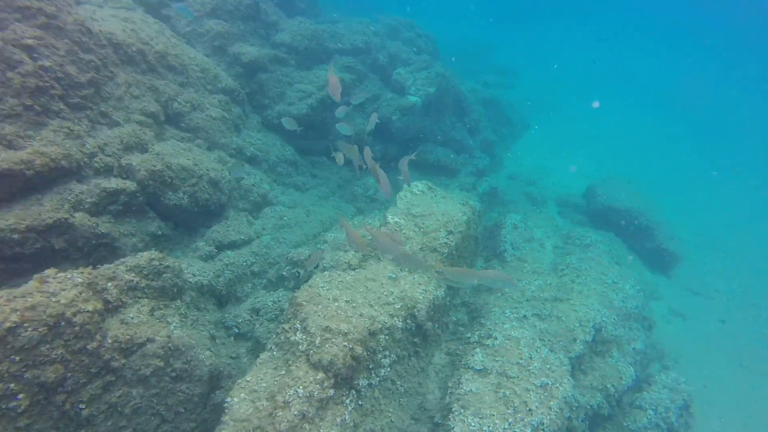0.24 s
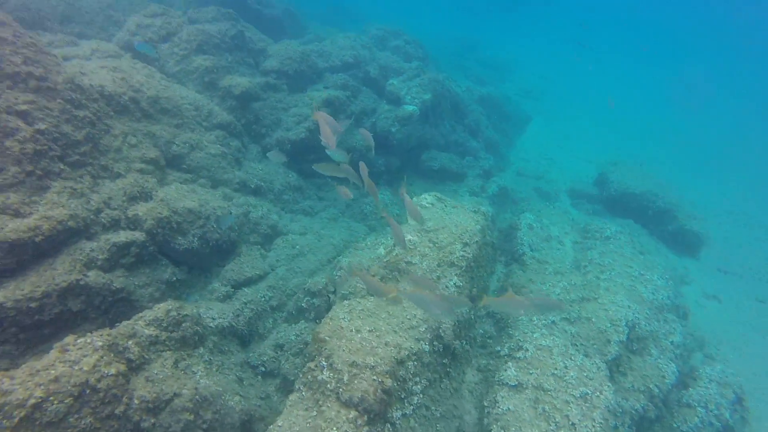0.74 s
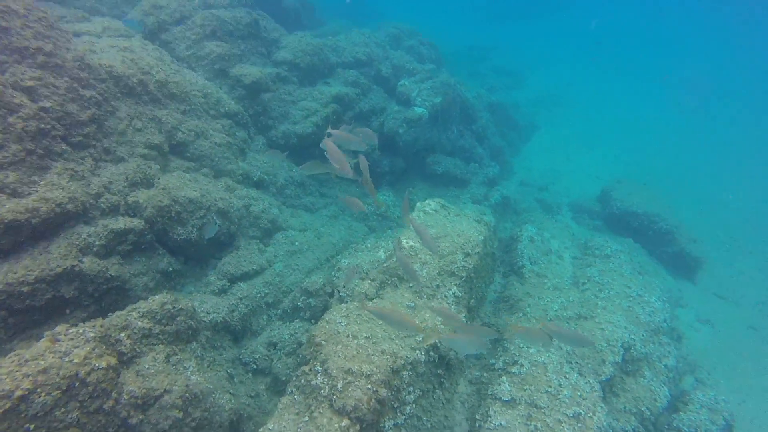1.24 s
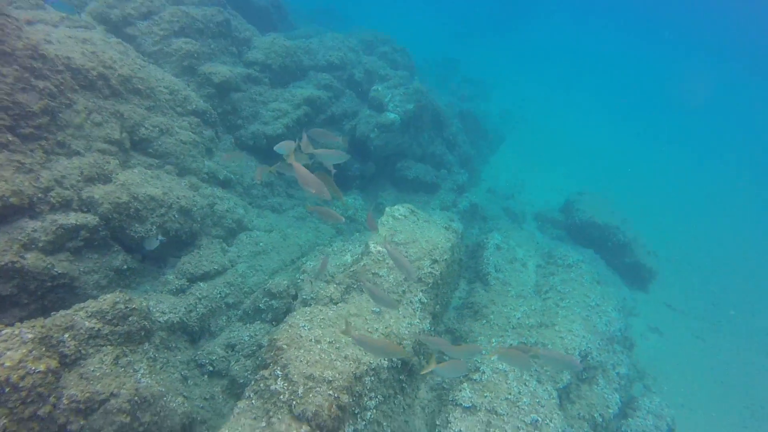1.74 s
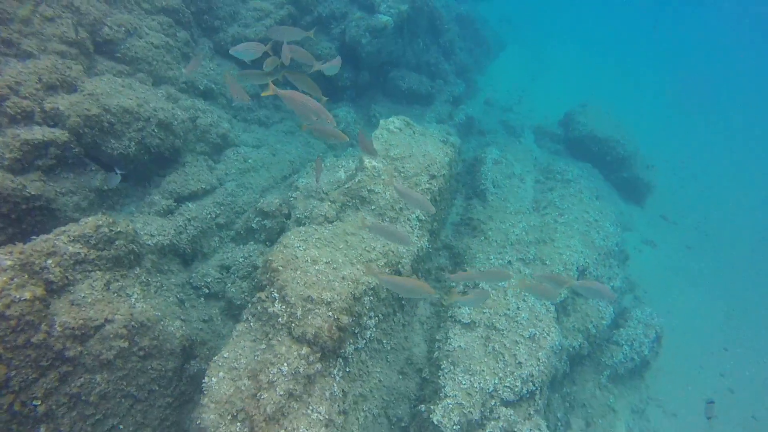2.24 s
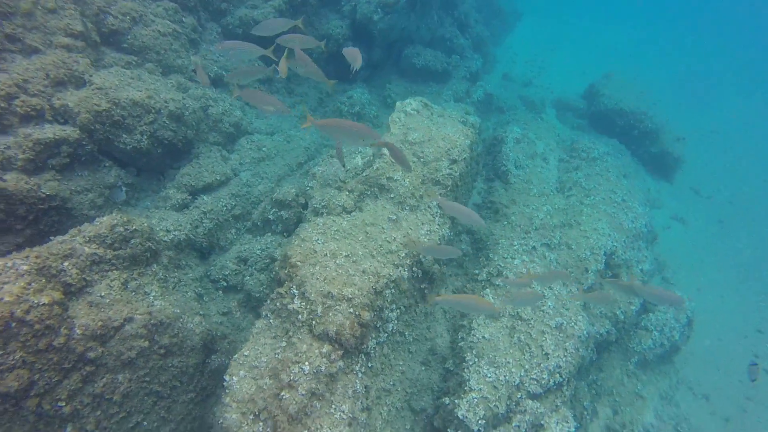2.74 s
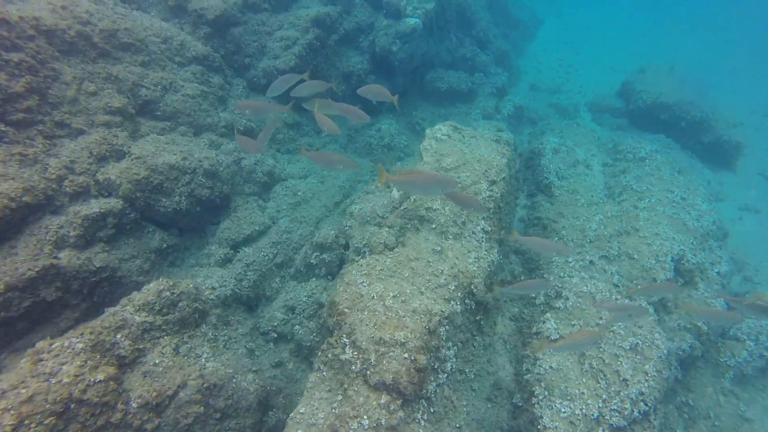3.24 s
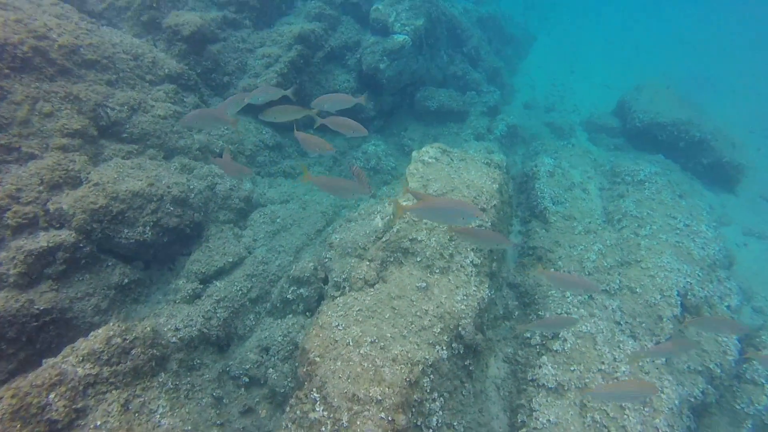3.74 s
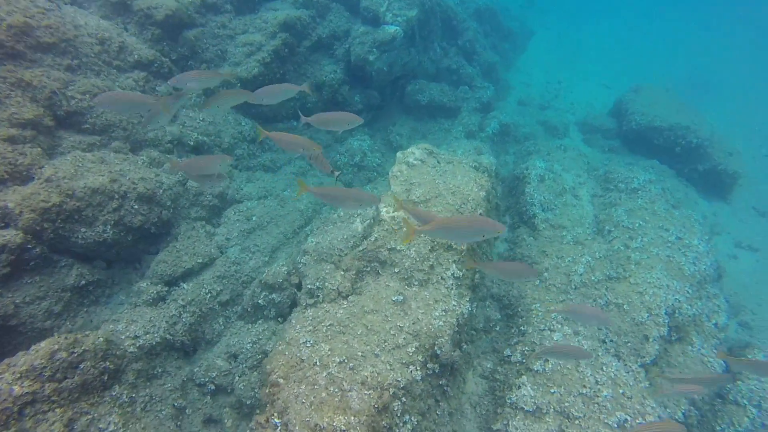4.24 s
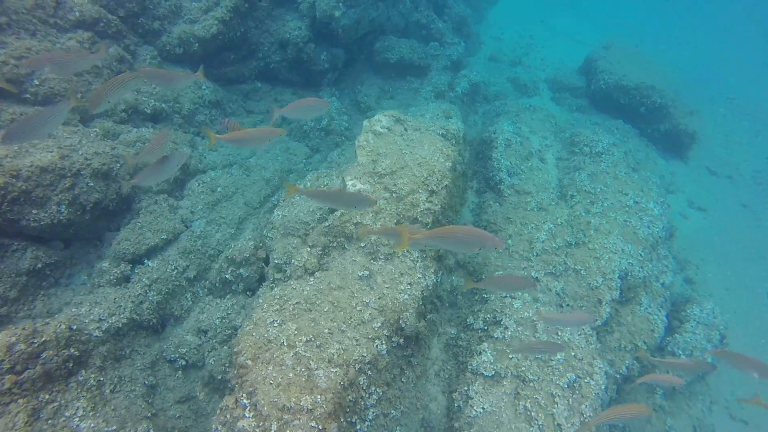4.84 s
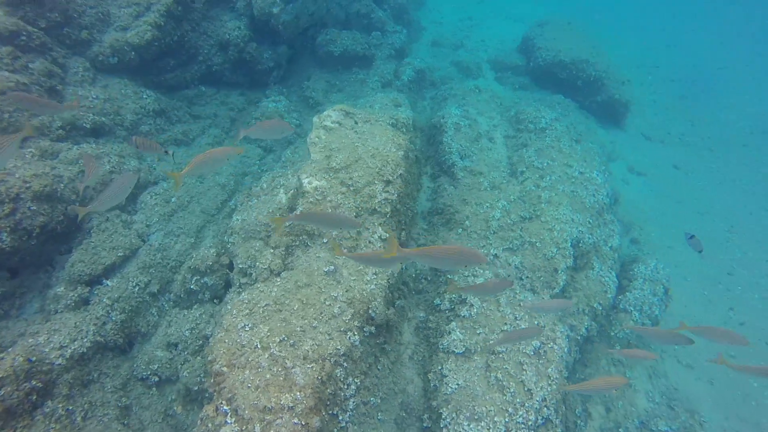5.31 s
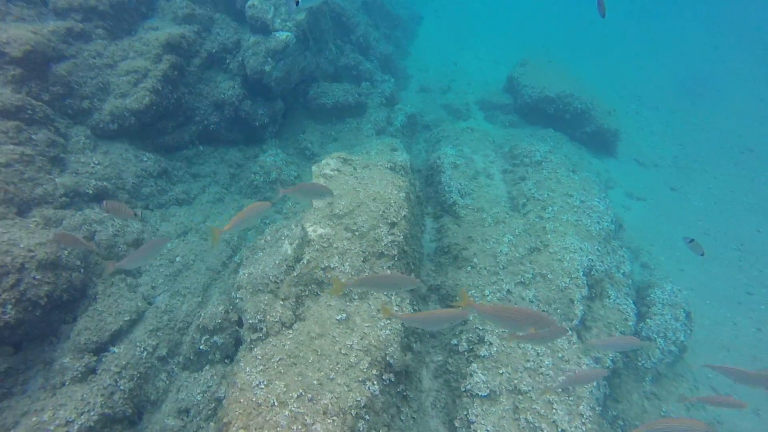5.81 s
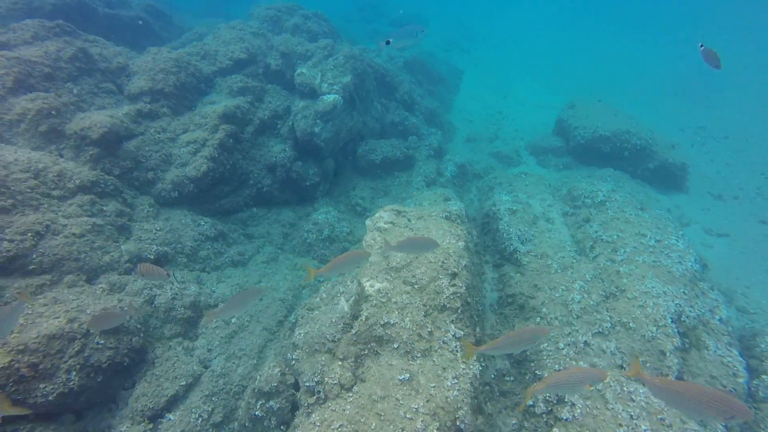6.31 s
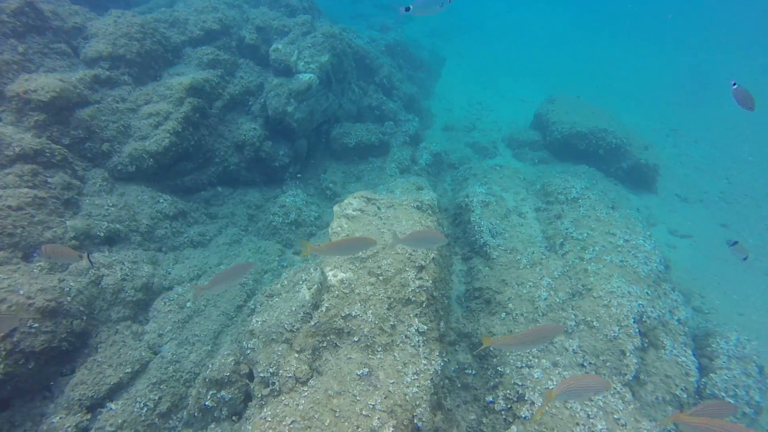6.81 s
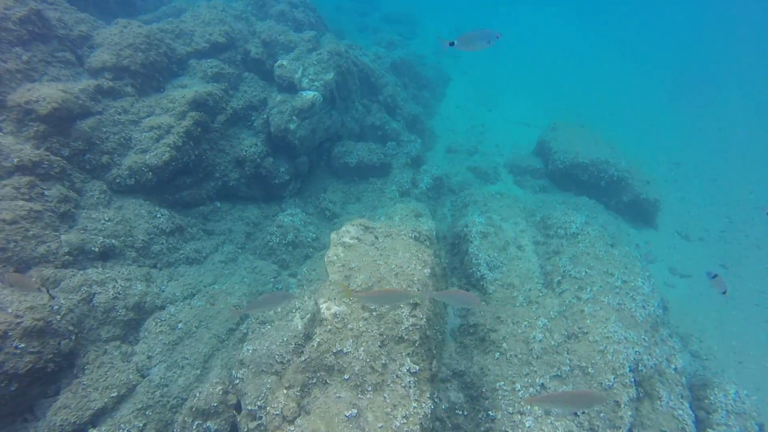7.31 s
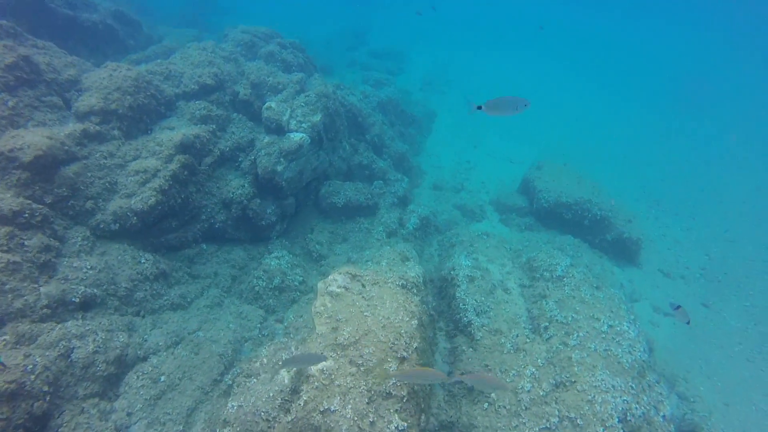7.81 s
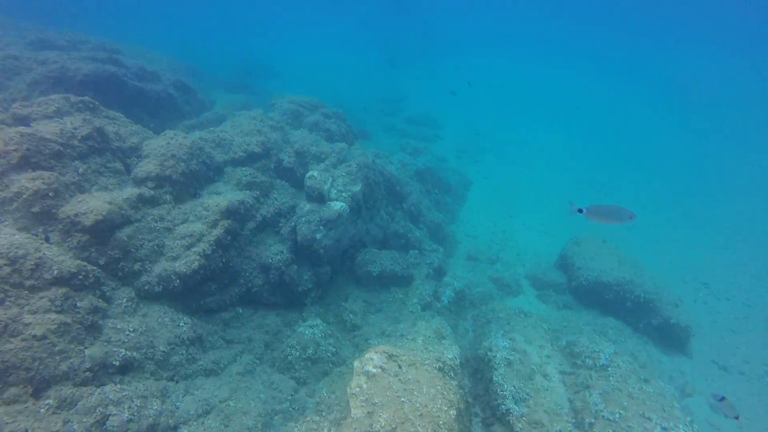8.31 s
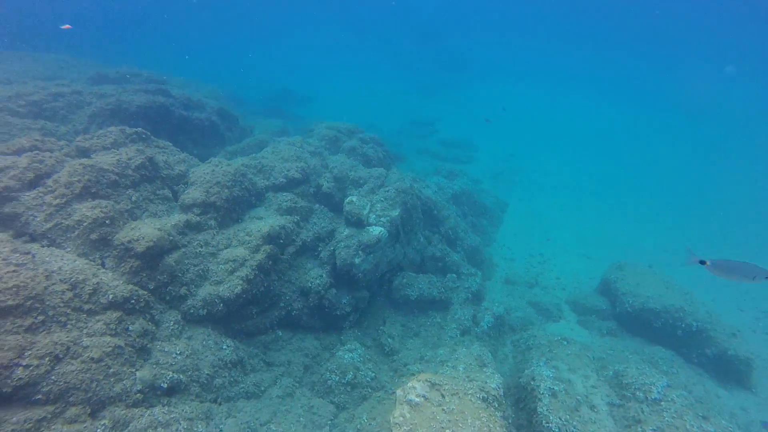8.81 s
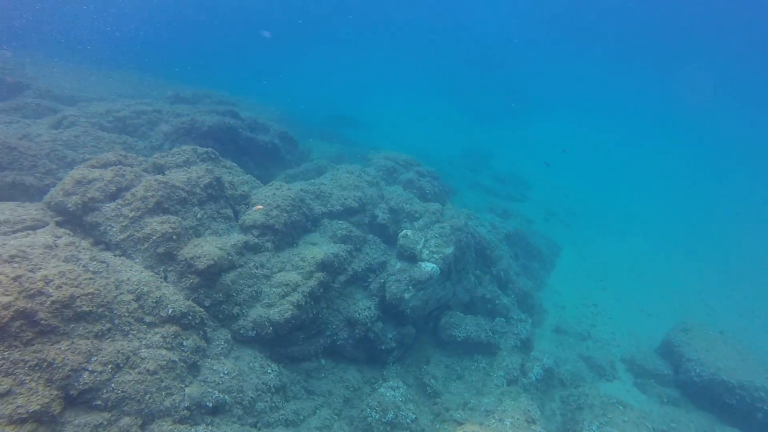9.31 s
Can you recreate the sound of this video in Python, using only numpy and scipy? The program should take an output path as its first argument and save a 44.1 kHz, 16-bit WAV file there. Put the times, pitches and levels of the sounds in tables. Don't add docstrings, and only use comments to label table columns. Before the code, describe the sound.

Steady dull sea hiss and tiny clicks, broken early by two creaky knocks and a rough wet rubbing on plastic, then calm again.

```python
import sys
import numpy as np
from scipy import signal
from scipy.io import wavfile

SR = 44100
rng = np.random.default_rng(int(sys.argv[2]) if len(sys.argv) > 2 else 0)


def rack_gain(trim_db):
    fader = np.asarray(trim_db, float)
    return 10 ** (fader / 20)


def log_audio(samples):
    frames = np.atleast_2d(samples).T
    limited = np.clip(frames, -1, 1)
    pcm = np.round(limited * 32767).astype(np.int16)
    wavfile.write(sys.argv[1], SR, pcm)


N = 421155

# resonance in Hz, width in Hz, level in dB.
WALL_MODES = [(653, 131, 7), (1784, 66, 3), (1910, 114, -2), (2440, 284, 2), (2603, 181, 6.5),
              (3180, 64, -4.5)]
# resonance in Hz, width in Hz, level in dB.
SEAL_MODES = [(4390, 110, 2.5), (4970, 1140, -9.5), (5830, 2260, -5), (7940, 320, -6.5), (8770, 400, -7),
              (11000, 900, -56), (12500, 1200, -24), (13600, 770, -26.5), (14800, 700, -35.5)]
# resonance in Hz, width in Hz, level in dB.
GRIP_MODES = [(355, 98, 1.5), (697, 130, 3.5), (953, 186, -0.5), (1120, 24, 2.5), (1376, 91, 2.5),
              (1580, 600, 1), (2070, 280, -36), (2330, 240, 5.5), (2625, 330, -7.5), (3110, 340, -12.5)]
# resonance in Hz, width in Hz, level in dB.
GRIP_TREBLE_MODES = [(3410, 87, 4.5), (4180, 260, -1), (4600, 280, -10), (5140, 380, -7.5),
                     (5900, 430, -21), (6400, 180, -22), (8200, 5600, -34), (10600, 1300, -39.5)]
# time in seconds, level in dB.
SWELL_CURVE = [(0.0, -47.5), (0.61, -37.5), (0.96, -49.5), (1.41, -31.5), (2.05, -45), (2.44, -43),
               (2.98, -33), (3.46, -50), (3.7, -43), (4.1, -45), (4.63, -47.5), (5.58, -44), (6.75, -48.5),
               (7.13, -39), (7.42, -42), (7.95, -44), (8.32, -44), (9.55, -47)]
# start in seconds, then upper wall, lower wall and top wall levels in dB.
SNAPS = [(0.0288, -9, -6, -14.5), (0.5182, -29, -33.5, -47), (0.6205, -25, -25.5, -34.5),
         (0.7337, -25, -29, -43), (0.9857, -16.5, -25, -43), (1.0755, -34, -29, -39.5),
         (1.1278, -22.5, -24, -38), (1.1752, 0.5, -13.5, -27), (1.26, -12.5, -30, -39),
         (1.6531, -24, -31, -43), (3.7858, -24, -31.5, -43), (3.9135, -21, -27, -40),
         (3.9465, -23, -27.5, -50), (4.0298, -27, -30, -44), (4.0956, -17, -31, -38),
         (4.7576, -18, -31, -46), (5.054, -17, -26.5, -30), (5.271, -18, -27, -37),
         (5.7349, -23, -28, -41.5), (5.934, -19, -21, -46), (5.9499, -12.5, -30, -24.5),
         (6.139, -20, -40, -33.5), (6.1739, -19.5, -20, -37), (6.6279, -29, -27.5, -39.5),
         (7.0784, -21, -29, -41), (7.3582, -15, -21.5, -42), (7.7643, -11.5, -17.5, -43),
         (8.1759, -27, -26, -45.5), (8.8059, -19.5, -34, -45), (9.236, -15.5, -20, -47)]
# start in seconds, level in dB.
THIN_SNAPS = [(0.473, -26.5), (0.9243, -24.5), (0.971, -22), (1.3224, -17), (3.1386, -32), (3.166, -32),
              (3.4371, -24.5), (3.4576, -25.5), (3.5672, -28), (3.7464, -21.5), (3.8814, -22.5),
              (4.0116, -24), (4.7115, -29), (5.2311, -25), (5.4161, -24), (5.8247, -33), (6.7416, -27),
              (6.9107, -29), (7.1258, -23), (7.5099, -21.5), (7.7493, -26), (8.0117, -28), (8.4986, -26.5),
              (8.6077, -22.5), (8.8217, -16), (9.0633, -26), (9.1721, -24), (9.3493, -20.5), (9.426, -28),
              (9.4804, -24)]
# start in seconds, low treble in dB, high treble in dB.
TICKS = [(0.0303, -39, -37), (0.6033, -35.5, -60), (0.6348, -48, -43), (0.7302, -39, -39),
         (0.9233, -36, -45), (1.1752, -53, -41), (1.26, -25, -38), (1.653, -28.5, -37), (3.6481, -35, -44),
         (3.7863, -33, -45), (3.8843, -35, -48), (3.9146, -35, -45), (4.2462, -34, -42), (4.588, -40, -40),
         (5.054, -25, -43), (5.1368, -28.5, -40), (5.1906, -35.5, -50), (5.2705, -37, -55),
         (5.9494, -53, -42), (6.14, -28.5, -61), (6.4364, -49, -45), (6.6269, -37.5, -54),
         (7.0774, -40, -47), (7.3567, -39, -43), (7.7904, -38, -56), (8.112, -37, -44), (8.2908, -41, -43),
         (8.498, -47, -42), (8.8061, -30, -44), (9.044, -37, -39)]
# start in seconds, level in dB.
FAINT_TICKS = [(0.12, -39), (0.4105, -49), (0.7035, -41), (1.5075, -44), (1.6664, -36), (1.957, -43),
               (1.9914, -43.5), (3.4366, -44), (3.6352, -47), (3.747, -40), (4.0285, -39), (4.0951, -42),
               (4.2638, -43), (4.5627, -41), (4.7566, -42), (4.931, -42), (4.994, -41.5), (6.2732, -39),
               (6.5121, -42), (6.787, -39), (7.017, -41), (7.1504, -41), (7.6835, -40), (8.1527, -40),
               (8.3195, -40), (8.542, -42), (9.1891, -40), (9.233, -37), (9.4814, -40)]
# start in seconds, peak in dB, pitch in Hz.
BUBBLES = [
    (1.203, -28.5, 614),
    (3.522, -34.5, 730),
    (5.826, -36.5, 875),
    (6.29, -35.5, 436),
    (7.875, -33, 600),
    (8.416, -40, 383),
    (.45, -39, 260),
]
# time in seconds, pressure in dB, speed in dB.
SLIDE_CURVE = [
    (1.96, -35.5, -43),
    (2.07, -32, -39.5),
    (2.14, -25, -29),
    (2.31, -22, -21),
    (2.356, -26.5, -37.5),
    (2.41, -20, -24.5),
    (2.8, -17.5, -20),
    (2.856, -21.5, -33),
    (3.08, -23.5, -32.5),
]
# start in seconds, peak in dB.
CATCHES = [
    (2.2118, -13),
    (2.248, 2),
    (2.2985, -0.5),
    (2.506, -6.5),
    (2.9214, -19),
    (2.9377, -19),
]
# start in seconds, push in dB, push pitch in Hz, ring in cycles, knock in dB.
BUMPS = [(1.293, -15.5, 60, 2.6, -34), (1.320, -9, 65.8, 2.5, -13), (1.339, -1, 78, 0.61, -6),
         (1.415, -19.5, 60, 0.88, -20.5), (1.589, -21, 80, 0.93, -28.5), (1.7062, -13, 102, 2.4, -44),
         (0.501, -39, 92, 4.7, -43), (3.255, -31, 214, 1.5, -42), (1.286, -23, 30.3, 0.89, -26),
         (1.738, -21, 35, 1.6, -42), (1.899, -27, 87, 0.99, -28.5), (2.055, -25, 92, 3.2, -21.5),
         (2.322, -13, 55.7, 1.8, -13.5), (2.504, -10.5, 66.5, 2.2, -18), (2.838, -7.5, 114.4, 2.5, -0.5),
         (2.92, -7.5, 64, 1.55, -48), (3.232, -27, 80, 0.4, -44), (3.275, -31, 92, 1.1, -30.5),
         (7.06, -36, 60.4, 3.6, -30.5)]
# start in seconds, end in seconds, slips per second, level in dB, low ring in dB.
CREAKS = [
    (1.314, 1.324, 870, -22, -24),
    (1.321, 1.327, 386, -10, -34),
    (1.3392, 1.347, 430, -4, -43),
    (1.36, 1.37, 272, -14.5, -25),
    (1.373, 1.379, 186, -8, -19),
    (1.3807, 1.402, 186, 1.5, -3),
    (1.697, 1.709, 500, -21, -21.5),
    (1.7063, 1.719, 291, -6.5, -1),
    (1.7137, 1.7294, 332, -9.5, -7),
]

WALL_CUT_HZ = 1592
HISS_DB, SEAL_HISS_DB, MURK_DB = -43, -65.5, -55
CRACKLE_PER_S, CRACKLE_DB, CRACKLE_MID_DB, CRACKLE_TOP_DB = 110, -46.5, -42, -67.5
THIN_LOWER_DB, THIN_TOP_DB = -16, -18
FAINT_HIGH_DB = -9.5
DUCK_S, DUCK_FALL_S, DUCK_DB, CREEP_DB_PER_S = 1.7, 0.04, -16.5, 5.5
RECOVER_S, RECOVER_DB_PER_S, REST_DB = 2.8, 3.5, 0.61
LAND_S, LIFT_S, LIFT_LOSS_DB = 0.033, 0.047, 23
TREBLE_DB, TREBLE_FOLLOWS = -51, 0.92
WOBBLE_DB, WOBBLE_FOLLOWS, WOBBLE_GROWS_DB_PER_S = -28, 0.55, 4
SCRAPE_DB, SCRAPE_FOLLOWS = -14.5, 1
SCRAPE_DAMPED = 0.089
HAND_GONE_S = 3.5
MIC_CUT_HZ, TOP_LEVEL = 14600, 1.02


def in_time(rows):
    s, *columns = np.transpose(rows)
    return [np.interp(np.arange(N) / SR, s, c) for c in columns]


def rms_one(x):
    return x / np.sqrt(np.mean(x ** 2) + 1e-20)


def cut(x, hz, kind, order=2):
    return signal.sosfilt(signal.butter(order, hz, kind, fs=SR, output="sos"), x)


def drift(hz):
    return rms_one(cut(rng.standard_normal(N + SR), hz, "low")[SR:])


def resonate(x, modes, order=1):
    faint = 1e-15 * np.cos(np.arange(len(x)))
    out = 0
    for k, (hz, width, level_db) in enumerate(modes):
        r = np.exp(-np.pi * width / SR)
        feed = [(1 - r * r) / 2, 0, (r * r - 1) / 2]
        ring = [1, -2 * r * np.cos(2 * np.pi * hz / SR), r * r]
        y = x + faint
        for _ in range(order):
            y = signal.lfilter(feed, ring, y)
        sign = (-1) ** (k * (order - 1))
        out = out + rack_gain(level_db) * y * sign
    return out


def clicks(seconds, levels_db):
    marks = np.zeros(N)
    marks[np.round(np.asarray(seconds) * SR).astype(int)] = rack_gain(levels_db)
    return marks


def bursts(seconds, levels_db, fade_s):
    starts = clicks(seconds, levels_db) + 1e-18
    fade = signal.lfilter([1], [1, -np.exp(-1 / (fade_s * SR))], starts)
    return fade * rng.standard_normal(N)


def snap(s, level_db):
    puff = bursts(s, level_db - 19, 0.0014)
    scatter = bursts(s, level_db - 24.5, 0.0039)
    return clicks(s, level_db) + puff + scatter


def while_held(x):
    return x[:int(HAND_GONE_S * SR)]


def then_silent(x):
    return np.pad(x, (0, N - len(x)))


def sea():
    walls = rms_one(cut(resonate(rng.standard_normal(N), WALL_MODES), WALL_CUT_HZ, "low"))
    seal = rms_one(cut(resonate(rng.standard_normal(N), SEAL_MODES), [3200, 13000], "band"))
    murk = rms_one(cut(rng.standard_normal(N), [70, 330], "band", order=1))
    leak = rms_one(cut(rng.standard_normal(N), [900, 1700], "band"))
    hiss = rack_gain(HISS_DB + 2.1 * drift(8.9)) * walls
    hiss += rack_gain(SEAL_HISS_DB + 0.47 * drift(30)) * seal
    hiss += rack_gain(MURK_DB - 11.0) * leak
    return hiss + rack_gain(MURK_DB + 0.65 * drift(10.0)) * cut(murk, 440, "low")


def swell():
    low = cut(cut(rng.standard_normal(N + SR), 30.6, "low"), 14, "high")[SR:]
    return rack_gain(in_time(SWELL_CURVE)[0] - 2.5 + 2.9 * drift(3.6)) * rms_one(low)


def recorder_gain():
    t = np.arange(N) / SR
    back_db = CREEP_DB_PER_S * (t - DUCK_S) + RECOVER_DB_PER_S * np.maximum(t - RECOVER_S, 0)
    fall = np.clip((t - DUCK_S) / DUCK_FALL_S, 0, 1)
    return rack_gain(REST_DB + fall * np.minimum(DUCK_DB + back_db, 0))


def far_shrimp():
    born = np.flatnonzero(rng.random(N) < CRACKLE_PER_S / SR) / SR
    size = rng.exponential(1, N)[:len(born)].clip(0, 1.6)
    tint = rng.standard_normal(N)[:len(born)].clip(-2, 1.7)
    body = resonate(bursts(born, CRACKLE_DB + 16 + 7.37 * size, 0.00046), WALL_MODES)
    top = resonate(bursts(born, CRACKLE_TOP_DB + 20.5 + 0.66 * size + 5.2 * tint, 0.00061), SEAL_MODES)
    mid_puffs = bursts(born, CRACKLE_MID_DB + 6.9 * size - 5.7 * tint, 0.00068)
    mid = resonate(mid_puffs, [(3280, 560, -3), (4800, 900, -9.5)], order=2)
    return mid + cut(body, WALL_CUT_HZ, "low") + cut(top, [3200, 12500], "band")


def near_shrimp():
    thin = [(s, db, db + THIN_LOWER_DB, db + THIN_TOP_DB) for s, db in THIN_SNAPS]
    s, upper_db, lower_db, top_db = np.transpose(SNAPS + thin)
    walls = resonate(snap(s, lower_db + 38.0), [(1230, 190, -28.5), (1782, 200, -2.0)], order=2)
    walls += resonate(snap(s, lower_db + 30.5), [(679, 152, 0)], order=2)
    walls += resonate(snap(s, upper_db + 23.5), [(2384, 514, -0.87), (2735, 304, 0.15)], order=2)
    walls += resonate(snap(s, top_db + 36), [(3360, 660, 0.016)], order=2)

    faint = [(s, db, db + FAINT_HIGH_DB) for s, db in FAINT_TICKS]
    s, low_db, high_db = np.transpose(TICKS + faint)
    low = cut(resonate(snap(s, low_db + 20.5), SEAL_MODES[:3]), [3700, 7200], "band", order=3)
    high = cut(resonate(snap(s, high_db + 31.0), SEAL_MODES[3:]), [6800, 14500], "band")
    return walls + low + high


def bubbles():
    out = np.zeros(N)
    t = np.arange(SR // 25) / SR
    for s, peak_db, hz in BUBBLES:
        at = round(s * SR)
        tone = np.sin(2 * np.pi * hz * (t + 1.7 * t * t))
        shape = np.exp(-t / 0.0049) * np.minimum(t / 0.001, 1)
        out[at:at + len(t)] += rack_gain(peak_db + 6.5) * tone * shape
    return out


def slide():
    pressure_db, speed_db = in_time(SLIDE_CURVE)
    t = np.arange(N) / SR
    before = (SLIDE_CURVE[0][0] - t) / LAND_S
    after = (t - SLIDE_CURVE[-1][0]) / LIFT_S
    away = np.maximum(np.maximum(before, after), 0)
    touch = (away < 1) * rack_gain(-LIFT_LOSS_DB * np.minimum(away, 1) ** 2)
    treble_db = TREBLE_DB + TREBLE_FOLLOWS * (speed_db + 30.5)
    wobble_db = WOBBLE_DB + WOBBLE_FOLLOWS * (pressure_db + 24)
    wobble_db = wobble_db + WOBBLE_GROWS_DB_PER_S * (np.clip(t, 1.9, 3.2) - 2.5)

    grain = while_held(rng.standard_normal(N) * rack_gain(1.8 * drift(70) + 1.2 * drift(18)))
    low = then_silent(rms_one(cut(resonate(grain, GRIP_MODES[:6]), 1740, "low", order=5)))
    high = then_silent(rms_one(resonate(grain, GRIP_MODES[6:], order=2)))
    treble = cut(resonate(grain, GRIP_TREBLE_MODES, order=2), [3450, 10900], "band", order=4)
    treble = then_silent(rms_one(treble))
    wobble = rms_one(cut(rng.standard_normal(N), [40, 130], "band", order=3)) * rack_gain(2.7 * drift(13))

    s, peak_db = np.transpose(CATCHES)
    catches = resonate(bursts(s, peak_db + 13.5, 0.0027), [(1460, 205, 1.5), (2630, 410, -8)], order=2)
    friction = rack_gain(pressure_db) * low + rack_gain(speed_db) * high + rack_gain(treble_db) * treble
    return touch * (friction + rack_gain(wobble_db) * wobble) + catches


def bumps():
    out, knocks = np.zeros(N), np.zeros(N)
    t = np.arange(SR // 8) / SR
    for s, push_db, hz, cycles, knock_db in BUMPS:
        at = round(s * SR)
        swing = hz * t
        shape = np.exp(-2 * swing / cycles) * np.minimum(4 * swing, 1)
        out[at:at + len(t)] -= rack_gain(push_db + 6.0) * np.sin(2 * np.pi * swing) * shape
        knocks[at] = -rack_gain(knock_db + 37)
    return out + resonate(cut(knocks + 1e-18, 440, "low"), GRIP_MODES[:4])


def creaks():
    at, slip_db, thud_db, scrape_db = [], [], [], []
    for start, end, per_s, level_db, low_db in CREAKS:
        s = np.arange(start, end, 1 / per_s)
        at += list(s + 0.025 / per_s * rng.standard_normal(16)[:len(s)])
        uneven_db = 1.4 * rng.standard_normal(16)[:len(s)]
        slip_db += list(level_db + uneven_db + 37)
        thud_db += list(low_db + uneven_db + 30.5)
        damping_db = SCRAPE_DAMPED * (low_db + 24)
        scrape_db += list(SCRAPE_DB + SCRAPE_FOLLOWS * level_db - damping_db + uneven_db + 7)
    gripped = resonate(clicks(at, slip_db), [(680, 128, 0)])
    gripped += resonate(clicks(at, thud_db), [(316, 118, 4.5), (177, 90, 1.5)], order=2)
    puffs = while_held(bursts(at, scrape_db, 0.0018))
    walls = resonate(puffs, [(1464, 420, 11.5), (2480, 470, -3), (3080, 280, -1)], order=2)
    splash = rack_gain(-13.5) * resonate(puffs, GRIP_TREBLE_MODES[:4], order=2)
    return cut(gripped, 660, "low", order=5) + then_silent(walls + splash)


def scene():
    background = recorder_gain() * (sea() + far_shrimp()) + swell()
    hand = slide() + bumps() + creaks()
    return (background + near_shrimp() + bubbles() + hand)[None]


def roll_off(x):
    return signal.sosfilt(signal.butter(12, 15770, fs=SR, output="sos"), x)


def record(dry):
    held = dry / (1 + (dry / TOP_LEVEL) ** 8) ** (1 / 8)
    mix = cut(held, MIC_CUT_HZ, "low", order=8)
    return roll_off(mix)


dry = scene()
out = record(dry)
log_audio(out)
```